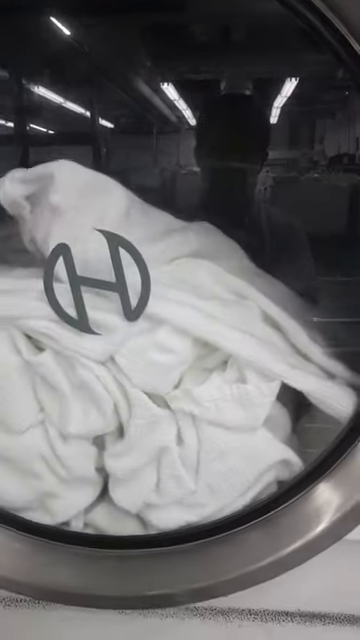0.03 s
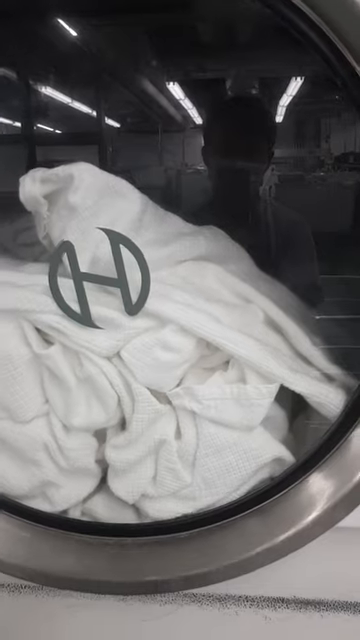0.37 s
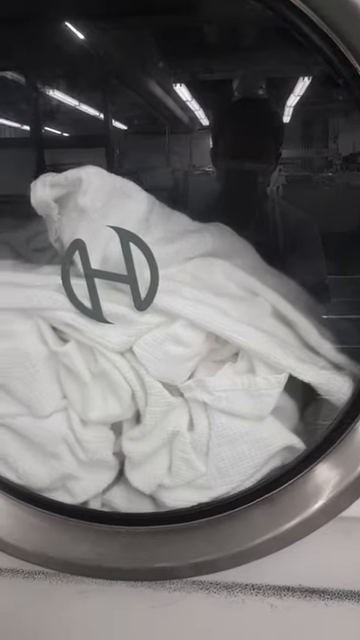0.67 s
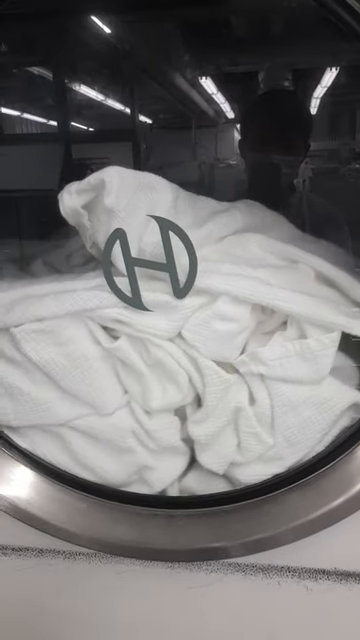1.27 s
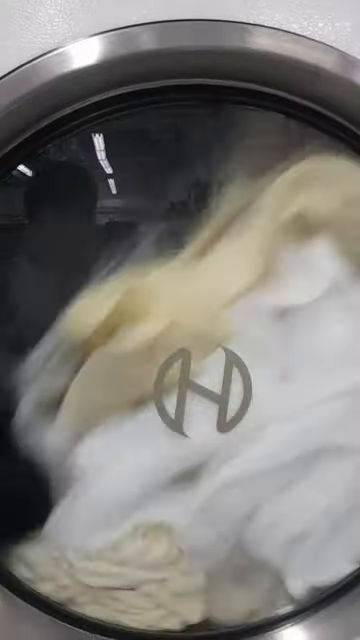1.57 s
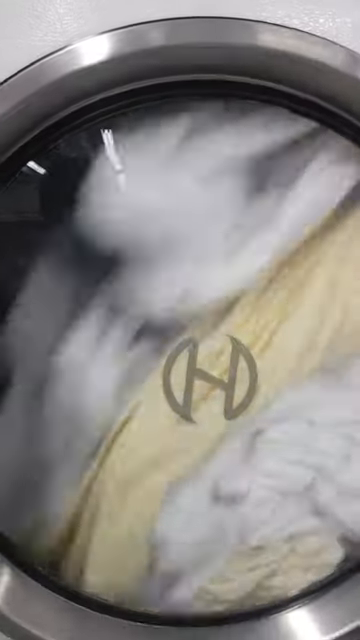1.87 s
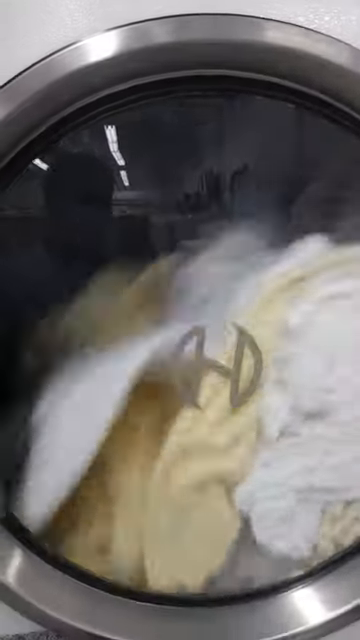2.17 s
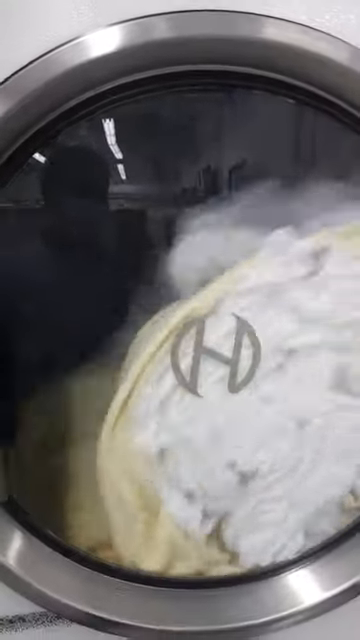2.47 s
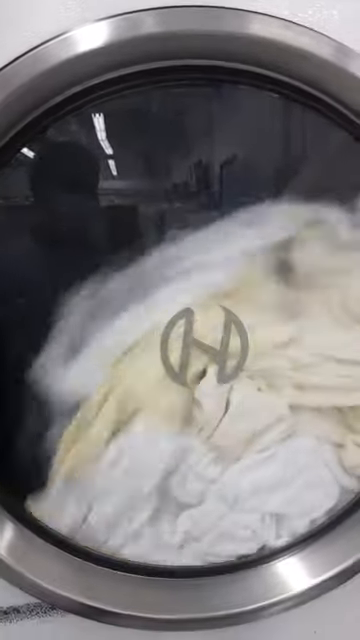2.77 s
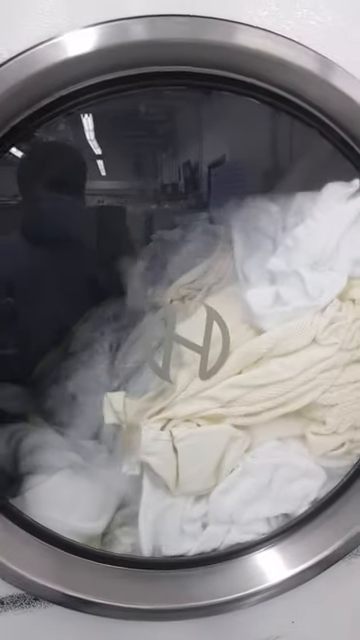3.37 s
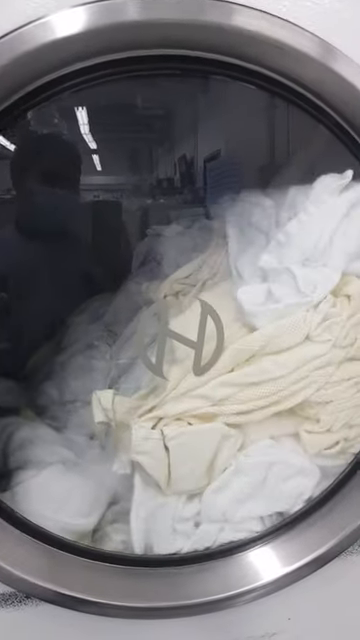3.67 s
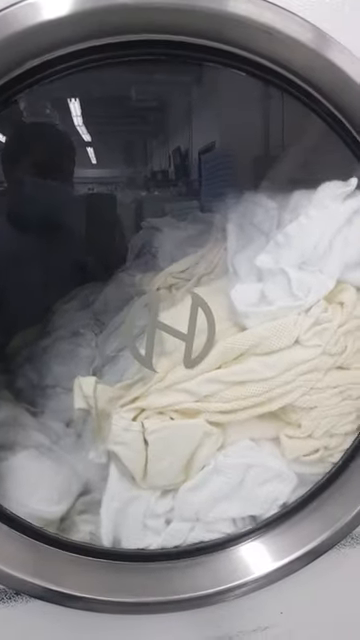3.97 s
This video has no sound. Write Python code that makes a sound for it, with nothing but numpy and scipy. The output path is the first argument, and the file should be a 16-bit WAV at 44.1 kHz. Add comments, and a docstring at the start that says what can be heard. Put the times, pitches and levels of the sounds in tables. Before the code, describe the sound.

Close in front of a big laundry machine in a hard-walled room, a deep drone and drum rumble run under a steady rush of air. After a split-second gap the hum returns slightly changed, and small bits tick faintly.

```python
"""A large laundry machine tumbles cloth in a hard-walled room, heard from just in front of its door.
From the start the motor drones, fans and drive add thin tones, the drum rumbles, and air rushes
and sings through the cabinet. Near 1.5 s the sound cuts out for an instant, then returns with
the tones and whistles in a new balance. After that, small hard bits tick faintly in the drum."""
import sys
import numpy as np
from scipy.fft import rfft, irfft, next_fast_len
from scipy.io import wavfile
from scipy.ndimage import map_coordinates

SR = 44100
rng = np.random.default_rng(int(sys.argv[2]) if len(sys.argv) > 2 else 0)


def unload_audio(sound):
    """Save the sound as a 16-bit wav file, at the path given as the first command line argument."""
    columns = np.transpose(np.atleast_2d(sound))
    # keep every value between -1 and 1, then stretch to whole-number steps
    steps = np.round(np.clip(columns, -1, 1) * 32767)
    wavfile.write(sys.argv[1], SR, steps.astype(np.int16))


N = 176400

# How the motor's hum swells and sags: t/s, level/dB (DRONE_TRIM_DB is added)
DRONE_SWELL = [(0, -27), (.13, -25), (.18, -20.5), (.29, -17.5), (.36, -23), (.45, -19.5), (.55, -30),
               (.65, -22.5), (.72, -27), (.83, -18), (.97, -24.5), (1.04, -21.5), (1.24, -22.5), (1.4, -22),
               (1.46, -36), (1.7, -22), (1.78, -36), (1.85, -20), (1.92, -25.5), (2.05, -24), (2.18, -27.5),
               (2.27, -24), (2.6, -24), (2.68, -32), (2.84, -25.5), (2.9, -22), (2.98, -24), (3.06, -32),
               (3.13, -24.5), (3.31, -32), (3.42, -25.5), (3.58, -21), (3.66, -25), (3.88, -24.5), (4, -28)]
# Which side is louder at each pitch: f/Hz, left minus right/dB
SIDE_BALANCE = [(60, 0.8), (150, 2.1), (290, -0.8), (550, 1), (950, 1.1), (1400, -0.5), (2000, -3.5),
                (2900, -6), (3600, -5), (4500, -2), (6200, -2), (7500, 0), (9500, 4.5), (10500, 3),
                (11600, 0), (15000, 0)]
# Tones of fans and drive: f/Hz, base level before the cut/dB, base level after it/dB,
# left minus right/dB, how far the left wave runs ahead/rad
FAN_TONES = [(109, -55, -33.5, 1.3, 0), (120, -35.5, -40, 1.3, 0), (172.3, -43, -34.3, 1.8, 0),
             (325.8, -35.8, -37.8, -3, -.4), (352.5, -51, -42.5, -.5, -.4), (360, -54, -45, 0, -.4),
             (386, -47, -45.5, 0, -.1), (472, -53, -51.5, 0, -.2), (480.8, -45.5, -43.3, 0, -.2),
             (652, -55.5, -53.5, -1, -1.6), (722, -62, -62, 0, -.5), (1114, -61, -65, 0, 1),
             (1233, -67, -57.5, -.6, .5)]
# Swell of the upper hum, two close tones that beat together: t/s, added level/dB
UPPER_HUM_BOOST = [(0, -4), (.65, -4.5), (.95, 1), (1.45, -3), (2.4, -1), (2.75, 1.5), (3, -6.5),
                   (3.3, 0.5), (3.85, -4.5), (3.96, 4)]
# Colour of the drum's rumble: f/Hz, relative level/dB
RUMBLE_SPECTRUM = [(10, -40), (20, -26), (30, -10), (41, 3), (48, -3), (56, -8), (66, -2), (88, -1.7),
                   (108, -5), (130, -6), (150, -3.2), (200, -3.3), (245, -13), (275, -9), (345, -13.8),
                   (410, -18), (490, -17.3), (530, -22.5), (700, -27.6), (1000, -40), (2000, -80)]
# How alike the noise is at the two ears: f/Hz, likeness (1 = the same, 0 = unrelated)
EAR_LIKENESS = [(60, 0.95), (130, 0.99), (290, 0.86), (500, 0.38), (750, 0.41), (1400, -0.17),
                (3000, 0.038), (15000, -0.026)]
# Dull surges of the drum: t/s, level/dB, centre f/Hz, half length/s
DRUM_SURGES = [(0.03, -24, 185, 0.037), (0.4, -24, 154.5, 0.07), (0.782, -30, 170, .045),
               (0.91, -28, 181, 0.043), (1.243, -30.5, 207, .09), (1.774, -22.5, 115, 0.034),
               (1.852, -24, 148, 0.017), (1.987, -25, 169, .025), (2.216, -27, 180, 0.015),
               (2.653, -32, 175, .07), (2.83, -32, 115, .03), (2.97, -25, 152, 0.029),
               (3.28, -25.5, 167, 0.036), (3.51, -31, 152, 0.017)]
# Colour of the air rushing through the cabinet: f/Hz, relative level/dB
AIR_SPECTRUM = [(200, -10), (500, 6), (760, 2), (980, 3), (1250, 0), (1450, 1), (1750, -0.9), (1950, -0.5),
                (2350, -2), (2780, -1.5), (3350, -3), (3650, -4), (4000, -5), (4250, -7.5), (4700, -8),
                (5500, -10.5), (6150, -8.5), (7000, -13.5), (8000, -18), (9200, -21), (10300, -16.5),
                (11400, -13), (13000, -16.5), (14200, -19), (14600, -32), (15400, -19.5)]
# Pitches that sing in the airflow: f/Hz, width/Hz, base level before the cut/dB,
# base level after it/dB, left minus right/dB
AIR_WHISTLES = [(2560, 70, -59.5, -68, -10), (2690, 60, -63, -59, -2), (2830, 70, -64, -59.5, -9),
                (3040, 80, -66, -60, -14), (3180, 70, -64, -60, -3), (3500, 70, -58, -56.5, -2.5),
                (3592, 24, -60, -56, -3), (3950, 130, -60, -72, -2), (4700, 40, -67, -67, 0)]
# Swell of the whistles: t/s, added level of the lower ones/dB, added level of the upper ones/dB
WHISTLE_BOOST = [(0, -1, 4), (.9, 0, 3), (1.3, 5, 5), (1.55, 3, -2), (1.8, 1, 5), (2.1, -2, 1),
                 (2.45, 2, 1), (2.72, 4, 8), (2.95, 2, -2), (3.15, -.5, 7), (3.35, -.5, 3), (3.55, -1, 4.5),
                 (3.8, 0, 4), (4, 2, 0)]
# Hard bits touching the drum: t/s, level/dB
DRUM_TICKS = [(1.657, -47), (2.444, -41), (2.761, -45), (3.675, -43.5), (3.788, -46)]
# Colour of a tick: f/Hz, relative level/dB
TICK_SPECTRUM = [(1000, -25), (3500, -9), (8500, -12), (11500, 3), (13500, 2), (15500, -3)]

DRONE_HZ, DRONE_DRIFT_HZ, DRONE_TRIM_DB = 54.6, .39, -.7
TONE_DRIFT_HZ, TONE_WAVER_DB = .4, .9
UPPER_HUM_FROM_HZ, UPPER_HUM_TO_HZ = 460, 500
RUMBLE_DB, SURGE_WIDTH_OCTAVES = -25, .35
AIR_DB, AIR_RISE_DB_PER_S, AIR_FLUTTER_DB = -36, .15, .3
ROOM_RIPPLE_DB, ROOM_RIPPLE_HZ = 1.2, 11  # depth and spacing of the room's peaks and dips
UPPER_WHISTLE_FROM_HZ = 3300
CUT_S, CUT_FADE_S, RESUME_S, RESUME_RISE_S = 1.449, .0026, 1.4837, .00013
TICK_RISE_S, TICK_RING_S = .00069, .1  # a tick dies away by 60 dB in its ring time
TOP_HZ = 15520


def gain(db):
    """Turn decibels into a number to multiply by."""
    return 10 ** (np.asarray(db) / 20)


def unit(x):
    """Scale a signal so its average strength (rms) is 1."""
    return x / np.sqrt(np.mean(x ** 2) + 1e-20)


def clock():
    """The time of each sample in seconds."""
    return np.arange(N) / SR


def at_pitch(table, hz):
    """Read between the rows of a table on a log frequency scale."""
    row_hz, values = np.transpose(table)
    return np.interp(np.log(hz + 1), np.log(row_hz + 1), values)


def wobble(position, size=256):
    """A smooth curve with a new random value at each whole-number position."""
    return map_coordinates(rng.standard_normal(size), [position], mode="mirror")


def filtered(x, response):
    """Make each frequency in x louder or softer by response(hz)."""
    size = next_fast_len(N + SR // 2)
    return irfft(rfft(x, size) * response(np.fft.rfftfreq(size, 1 / SR)), size)[..., :N]


def panned(lean_db):
    """Left and right gains; a positive lean makes the left louder."""
    return gain(np.vstack([lean_db, -lean_db]) / 2)


def stereo_noise(spectrum):
    """Coloured noise, nearly the same at both ears in the bass and spread wide in the treble."""
    def colour(hz):
        spread = np.arccos(np.clip(at_pitch(EAR_LIKENESS, hz), -1, 1)) / 2
        return gain(at_pitch(spectrum, hz)) * [np.cos(spread), np.sin(spread)]
    mid, side = filtered(rng.standard_normal((2, N)), colour)
    ears = np.array([mid + side, mid - side])
    return unit(filtered(ears, lambda hz: panned(at_pitch(SIDE_BALANCE, hz))))


def spin(hz, drift_hz):
    """The angle of a turning part whose speed wanders a little."""
    return 2 * np.pi * (np.cumsum(hz + drift_hz * wobble(6 * clock())) / SR + rng.random())


def switch_at_cut(before, after):
    """One value up to the cut, another from there on."""
    return np.where(clock() < CUT_S + CUT_FADE_S, before, after)


def motor_drone():
    """The turning motor makes one deep hum that swells and sags."""
    level_db = np.interp(clock(), *np.transpose(DRONE_SWELL)) + DRONE_TRIM_DB
    hum = np.sqrt(2) * np.sin(spin(DRONE_HZ, DRONE_DRIFT_HZ))
    return gain(level_db) * hum * panned(at_pitch(SIDE_BALANCE, DRONE_HZ))


def fan_and_drive_tones():
    """Spinning fans and drive make thin, wavering tones, each with its own place in the room."""
    out = np.zeros((2, N))
    swell_db = np.interp(clock(), *np.transpose(UPPER_HUM_BOOST))
    for hz, before_db, after_db, lean_db, lead in FAN_TONES:
        level_db = switch_at_cut(before_db, after_db) + TONE_WAVER_DB * wobble(7 * clock())
        if UPPER_HUM_FROM_HZ < hz < UPPER_HUM_TO_HZ:
            level_db += swell_db
        angle = spin(hz, TONE_DRIFT_HZ) + np.vstack([lead, -lead]) / 2
        out += np.sqrt(2) * gain(level_db) * panned(lean_db) * np.sin(angle)
    return out


def drum_rumble():
    """The drum rumbles, with a soft boom of low noise each time the load shifts."""
    out = gain(RUMBLE_DB) * stereo_noise(RUMBLE_SPECTRUM)
    for peak_s, level_db, centre_hz, half_length_s in DRUM_SURGES:
        band = lambda hz: np.exp(-.5 * (np.log2((hz + 1) / centre_hz) / SURGE_WIDTH_OCTAVES) ** 2)
        boom = unit(filtered(rng.standard_normal(N), band))
        swell = np.exp(-.5 * ((clock() - peak_s) / half_length_s) ** 2)
        out += gain(level_db) * swell * boom * panned(at_pitch(SIDE_BALANCE, centre_hz))
    return out


def air_rush():
    """Air flows steadily through the cabinet; the room colours it differently at each ear."""
    def room_ripple(hz):
        ears = np.array([wobble(hz / ROOM_RIPPLE_HZ, size=2048) for _ in range(2)])
        return gain(ROOM_RIPPLE_DB * ears)
    t = clock()
    level_db = AIR_DB + AIR_RISE_DB_PER_S * (t - t.mean()) + AIR_FLUTTER_DB * wobble(14 * t)
    return gain(level_db) * unit(filtered(stereo_noise(AIR_SPECTRUM), room_ripple))


def air_whistles():
    """Swirling air makes its path ring; the lower and upper whistles swell at different times."""
    out = np.zeros((2, N))
    times, lower_db, upper_db = np.transpose(WHISTLE_BOOST)
    for centre_hz, width_hz, before_db, after_db, lean_db in AIR_WHISTLES:
        peak = lambda hz: 1 / (1 + 2 * ((hz - centre_hz) / width_hz) ** 2)
        ring = unit(filtered(rng.standard_normal((2, N)), peak))
        swell_db = np.interp(clock(), times, upper_db if centre_hz > UPPER_WHISTLE_FROM_HZ else lower_db)
        out += gain(switch_at_cut(before_db, after_db) + swell_db) * panned(lean_db) * ring
    return out


def drum_ticks():
    """Small hard bits touch the drum, each making a short, bright burst of noise."""
    loudness = np.zeros(N)
    for start_s, level_db in DRUM_TICKS:
        age = np.maximum(clock() - start_s, 0)
        rise = 1 - np.exp(-age / TICK_RISE_S)
        decay = gain(-60 * age / TICK_RING_S)
        loudness += gain(level_db) * rise * decay
    return loudness * stereo_noise(TICK_SPECTRUM)


def scene():
    """Add up all the parts of the running machine."""
    turning_parts = motor_drone() + fan_and_drive_tones() + drum_rumble()
    return turning_parts + air_rush() + air_whistles() + drum_ticks()


def record(dry):
    """The sound drops out for an instant and snaps back; nothing above TOP_HZ gets through."""
    t = clock()
    fade_out = np.exp(-np.maximum(t - CUT_S, 0) / CUT_FADE_S)
    fade_in = 1 - np.exp(-np.maximum(t - RESUME_S, 0) / RESUME_RISE_S)
    return filtered(dry * (fade_out + fade_in), lambda hz: hz < TOP_HZ)


dry = scene()
out = record(dry)
unload_audio(out)
```